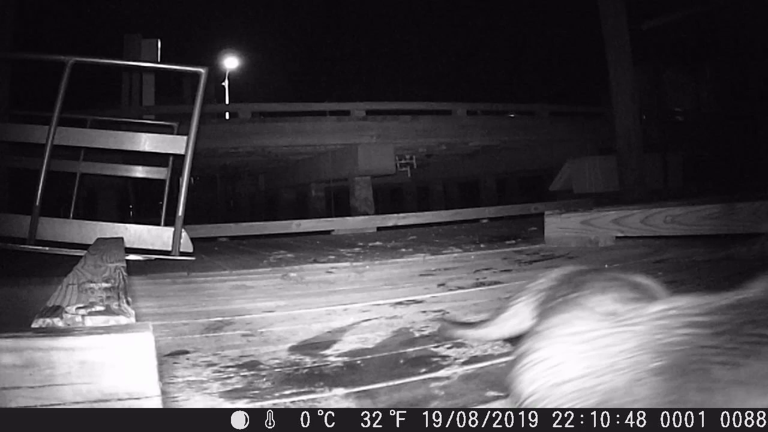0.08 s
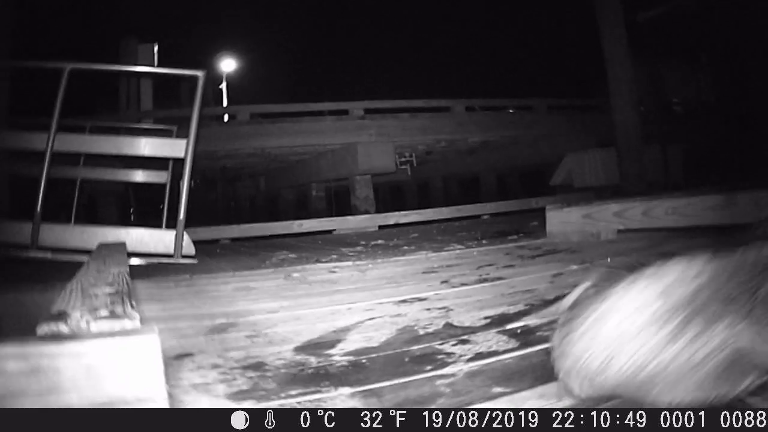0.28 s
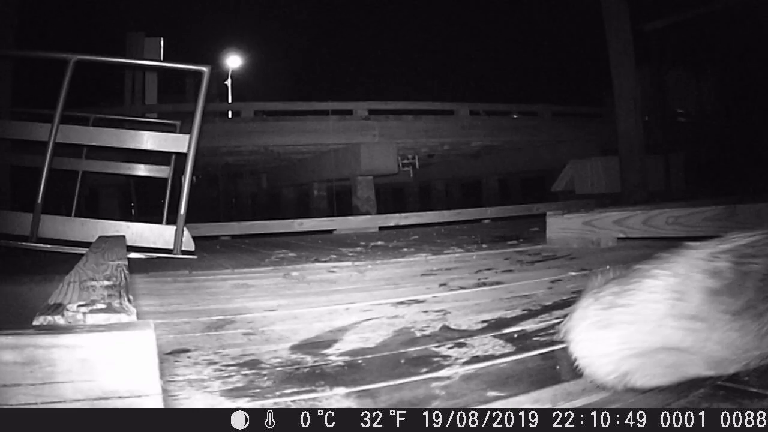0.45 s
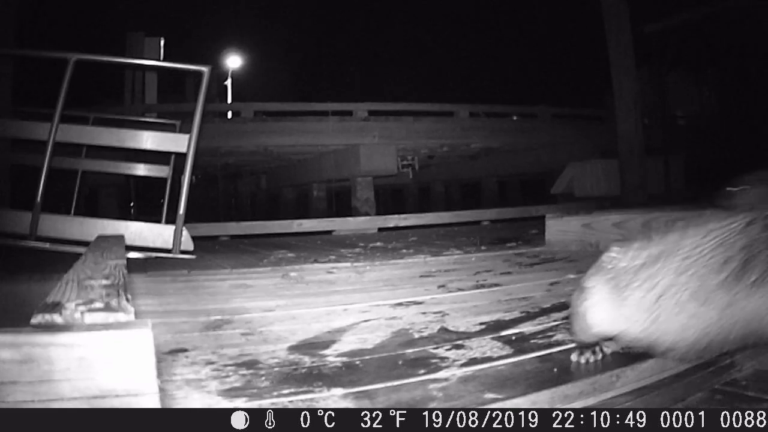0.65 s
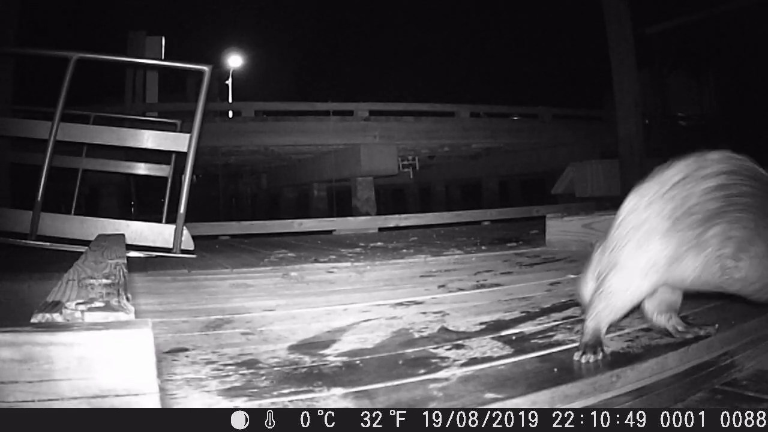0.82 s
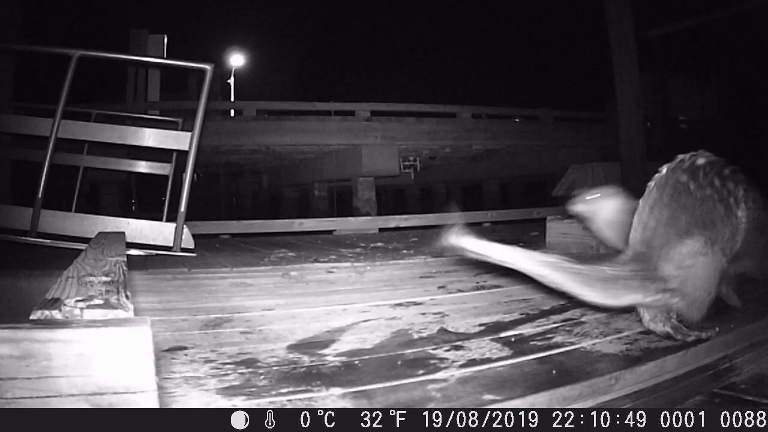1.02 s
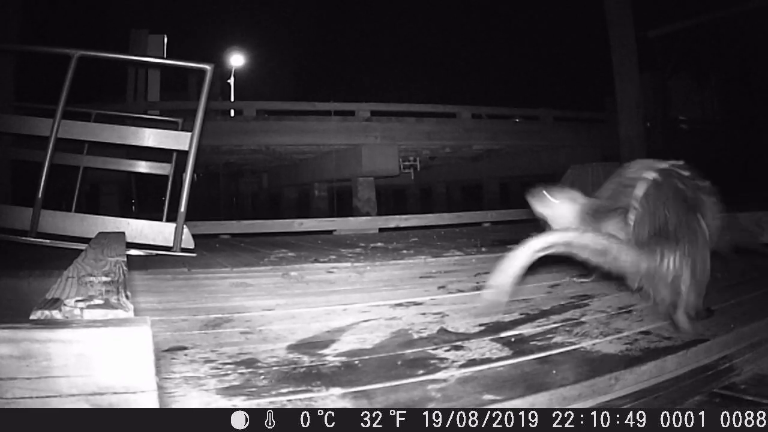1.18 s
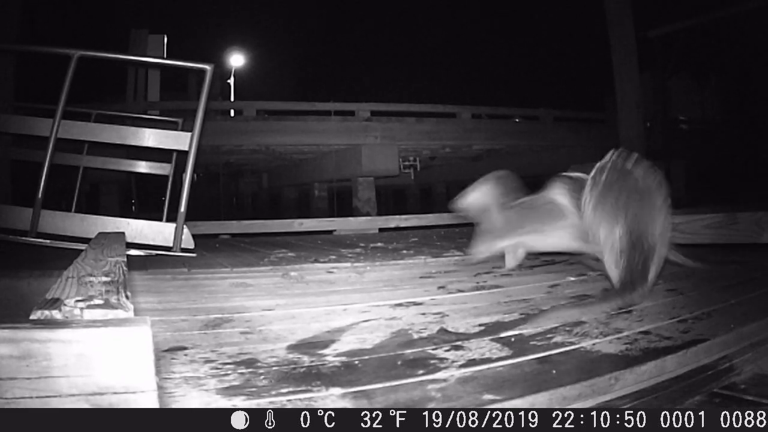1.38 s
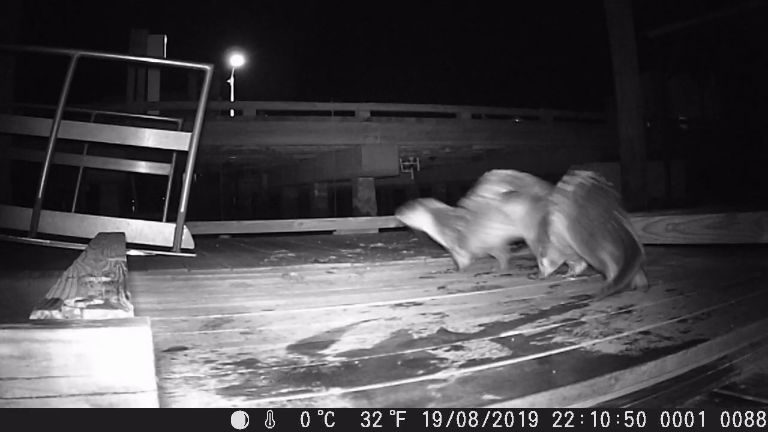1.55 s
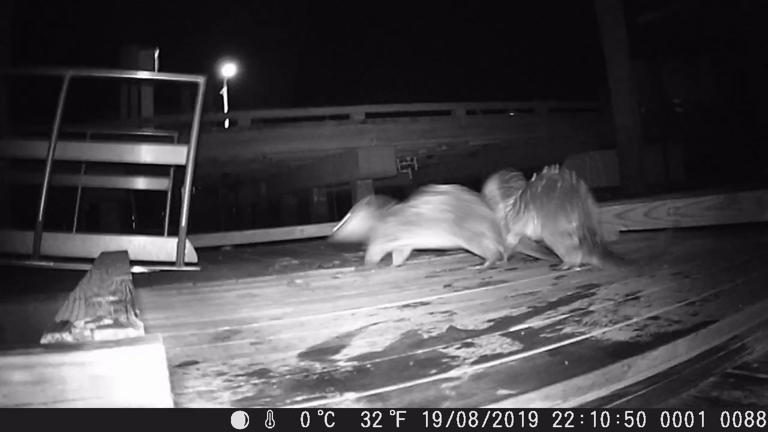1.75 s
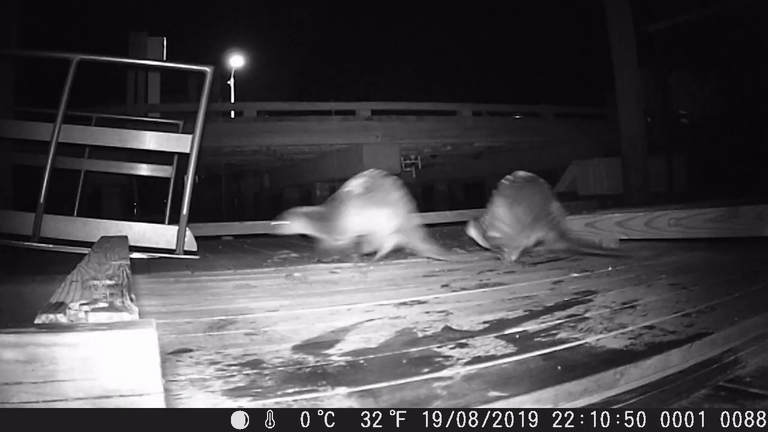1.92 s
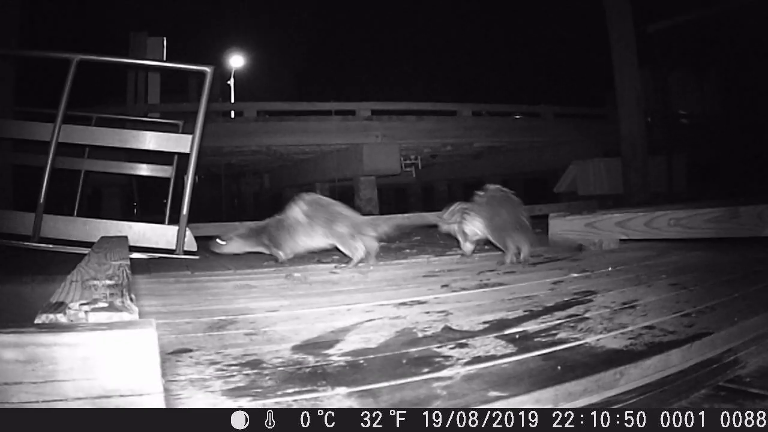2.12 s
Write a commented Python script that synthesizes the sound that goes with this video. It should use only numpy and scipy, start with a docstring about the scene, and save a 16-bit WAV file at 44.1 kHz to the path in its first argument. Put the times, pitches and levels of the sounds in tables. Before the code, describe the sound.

Scuffling on hollow wooden boards: brief claw scrapes and a heavy low bump, sparse faint scratches, then two sharp loud knocks amid busy scrabbling, and finally one ringing beam knock; close, dull handling-like sound, quiet night background.

```python
"""On a wooden dock at night, two animals scuffle close to a small camera standing on the boards.
Paws knock: each blow rings the planks and adds a gritty crack, and one blow rings a farther beam.
Claws and fur scrape: bursts of tiny random slips, coloured by the wood.
The deck sways in low gliding tones and once jolts the camera; there is also one thin squeak.
Behind this lie patchy background noise, a faint rumble and a very faint hiss, all filtered or plain noise."""
import sys
import numpy as np
from scipy import signal
from scipy.io import wavfile
from scipy.ndimage import uniform_filter1d

SR = 44100
rng = np.random.default_rng(int(sys.argv[2]) if len(sys.argv) > 2 else 0)


def generate_wav(sig):
    """Save sig (samples, or channels by samples) to the path in sys.argv[1] as 16-bit PCM at SR."""
    pcm = np.round(np.clip(np.atleast_2d(sig).T, -1, 1) * 32767).astype(np.int16)
    wavfile.write(sys.argv[1], SR, pcm)


def elevation(decibels):
    """Turn decibel levels (scalar or array-like) into linear amplitude ratios."""
    levels = np.asarray(decibels, float)
    return 10 ** (levels / 20)


N = 97020  # length in samples

# Colour of the background noise. Each row: frequency in Hz, relative level in dB per Hz.
BACKGROUND_COLOUR = [(15, -20), (60, -2), (107, -3), (150, -18), (300, -26), (460, -29), (890, -36),
                     (1330, -32), (1700, -41), (2500, -44), (3300, -53), (5000, -58), (6300, -59),
                     (7200, -56), (8500, -63), (9700, -78)]
BACKGROUND_DB, PATCH_DB = -51, 1.5  # overall level, and how unevenly it flickers
# Level of the low rumble in the deck. Each row: time in seconds, level in dB.
RUMBLE_LEVEL = [(0.0, -63), (0.14, -59.5), (0.25, -49), (0.69, -69), (1.07, -57.5), (1.43, -59.5),
                (1.53, -54.5), (1.68, -40.5), (1.83, -52.5), (2.07, -62.5), (2.2, -60.5)]
# Colour of the rumble. Each row: frequency in Hz, relative level in dB per Hz.
RUMBLE_COLOUR = [(15, -20), (40, 0), (110, -2), (200, -10), (320, -15), (500, -30), (1500, -45),
                 (3500, -90)]
HISS_DB = -99

# Sways of the deck. Each row: start in seconds, length in seconds, level in dB, first Hz, last Hz.
SWAYS = [(0.189, 0.062, -28.5, 23.5, 25.2), (0.279, 0.046, -31.5, 45.6, 44.6),
         (0.328, 0.09, -33.5, 27.3, 29.8), (0.648, 0.095, -27.5, 37.2, 59.6), (.905, 0.038, -30, 41, 40.3),
         (0.936, 0.097, -34, 39.7, 76.7), (1.43, 0.14, -42.5, 71.4, 95), (1.665, 0.028, -31, 116, 130),
         (1.71, 0.046, -32.5, 55, 60), (1.76, 0.16, -32, 45.7, 54)]
# A thin squeak, in one row: start in seconds, length in seconds, level in dB, first Hz, last Hz.
SQUEAK = (.105, .09, -63, 1325, 1350)
SWAY_SOFT = 0.92  # larger = gentler start and end
SWAY_PEAK = 0.33  # share of the length at which a sway or the squeak is strongest

# The jolt of the camera: a push held for a moment, then a longer, weaker rebound.
JOLT_S, JOLT_DB = 0.2305, -9
HOLD_MS, REBOUND_MS, EDGE_MS = 10, 21, 4.5
REBOUND_SHARE = 0.42  # strength of the rebound as a share of the push
SAG_HZ = 9  # the microphone lets slow pushes sag below about this frequency

# Claws and fur dragged over wood.
# Each row: start in seconds, length in seconds, first level in dB, last level in dB, extra treble in dB
# (before the shares in TREBLE_SHARE).
SCUFFS = [(0.181, .019, -60.5, -44.5, -4), (0.197, .031, -39.5, -45.5, -3), (.228, 0.03, -54.5, -59, -0.5),
          (0.233, 0.007, -57, -55, 9.5), (0.263, 0.081, -62.5, -51.5, -10.5), (0.325, 0.068, -46, -58, -5),
          (0.412, 0.032, -60, -70, -18), (0.463, 0.027, -62, -57, -11), (0.5, 0.024, -55, -65.5, -0.5),
          (0.616, 0.0354, -54, -59, 0.5), (0.648, 0.033, -59.5, -56.5, 2), (0.775, 0.14, -79, -69, -5),
          (.895, 0.037, -55.5, -52, -9.5), (0.997, 0.014, -63, -65.5, 0), (1.079, 0.063, -70, -77, -14),
          (1.244, 0.13, -66, -57.5, -6), (1.381, 0.074, -68, -70.5, 0), (1.456, 0.029, -53, -59, -21),
          (1.485, 0.0081, -52, -62, 8.5), (1.512, 0.047, -51.5, -59.5, -5),
          (1.556, 0.0503, -62, -52.5, -0.5), (1.606, 0.0082, -50.5, -45, 3.5),
          (1.614, 0.015, -41, -45, 0.5), (1.63, 0.0114, -47, -57.5, -2.5), (1.635, 0.024, -40.5, -51, -2.5),
          (1.665, .035, -46.5, -47.5, -7.5), (1.695, 0.048, -48, -45.5, -3),
          (1.729, 0.021, -58.5, -64.5, 12.5), (1.751, .062, -57, -46, -2), (1.804, 0.014, -39, -44, -0.5),
          (1.815, 0.037, -45.5, -48.5, -9), (1.856, 0.016, -47.5, -59, -3), (1.874, 0.038, -69.5, -68, -27),
          (2.079, 0.036, -51.5, -62, -20)]
SCUFF_EDGE_MS = 1.2
GRAINS_PER_S, GRAIN_SPREAD_DB, CLUMP_DB = 3000, 0.5, 0.5  # slips, their unevenness, their clumping
RING_DB = -5  # plank ringing in a scuff, next to its direct sound
# Colour of scrapes and cracks. Each row: frequency in Hz, relative level in dB per Hz.
GRIT_COLOUR = [(100, -12), (300, -5), (550, -2), (720, 2), (900, -6), (1350, 0), (1750, -10), (2000, -7),
               (2550, -6), (3100, -24), (3600, -25), (4400, -31), (5100, -42), (6400, -48), (6900, -30),
               (9000, -37), (9800, -70)]
# How much of the extra treble reaches each pitch. Each row: frequency in Hz, share of the extra treble.
TREBLE_SHARE = [(900, 0.22), (1300, 0.42), (2600, 1.32), (3600, 1.4), (6000, 1.75)]

# Paw blows on the planks.
# Each row: time in seconds, level in dB, contact time in milliseconds, level of the crack in dB.
KNOCKS = [(0.329, -23, 5.66, -42), (.339, -28, 5.87, -37.5), (.470, -44.5, 0.94, -55),
          (.628, -35.5, 7.1, -47), (.662, -44, 5, -72), (.899, -34, 5.1, -58.5), (1.268, -44.5, 6.9, -84),
          (1.456, -42.5, 1.4, -54), (1.487, -54, 2.1, -45), (1.516, -39.5, 3, -64),
          (1.570, -36.5, 1.15, -51), (1.6555, -12.5, 0.79, -30), (1.719, -31.5, 5.9, -58),
          (1.768, -28, 8.1, -45), (1.805, -30, 3.2, -39.5), (1.8108, -10.5, 4.31, -30),
          (1.843, -29, 2.5, -52.5)]
# Ringing tones of the planks. Each row: frequency in Hz, relative level in dB, time to fade 60 dB in seconds.
PLANK = [(140.7, 6, 0.065), (242, 3, 0.04), (328.2, 3, 0.049), (581, 5, 0.042), (688, 0.5, 0.087),
         (790, 4, 0.016), (982, -5, 0.021), (1320, -2, 0.017), (1520, -0.5, .025), (1970, -1, .02),
         (2320, -4, 0.021), (2580, 2.5, .02)]
CRACK_T60_S, CRACK_TREBLE_DB = 0.035, -3  # time to fade 60 dB, and extra treble before the shares
# A blow on a farther beam, in one row: time in seconds, level in dB, contact time in milliseconds.
BEAM_BLOW = (2.0855, -27, 2.1)
# Ringing tones of the beam. Each row: frequency in Hz, relative level in dB, time to fade 60 dB in seconds.
BEAM = [(141.2, -2, 0.37), (254, -12, 0.31), (360.3, -1.5, 0.2), (404.5, -6, 0.16), (493, -10, 0.14),
        (438, -1.5, 0.042), (544, -11, .04), (733, -19.5, 0.15), (1080, -9.5, 0.053), (1226, 7.5, .06),
        (1400, -3, .08)]


def evened(x):
    """Scales a sound to an average (rms) strength of 1."""
    return x / np.sqrt(np.mean(x ** 2) + 1e-20)


def read(points, hz):
    """Reads a table between its rows, on a log-frequency axis as the ear hears pitch."""
    table_hz, value = np.transpose(points)
    return np.interp(np.log(hz + 1), np.log(table_hz + 1), value)


def level(curve):
    """Turns a table of times and dB into a gain for every sample."""
    return elevation(np.interp(np.arange(N) / SR, *np.transpose(curve)))


def add(mix, start_s, sound):
    """Mixes a sound in at the given time."""
    part = mix[round(start_s * SR):][:len(sound)]
    part += sound[:len(part)]


def coloured(x, points):
    """Filters a sound to the given colour, with no sound ahead of its cause (minimum phase)."""
    colour_db = np.maximum(read(points, np.fft.rfftfreq(8192, 1 / SR)), -100)
    half = np.log(elevation(colour_db))
    both_halves = np.r_[half, half[-2:0:-1]]
    spectrum = np.exp(np.conj(signal.hilbert(both_halves)))
    response = np.fft.ifft(spectrum).real[:4096]
    return signal.oaconvolve(x, response)[:len(x)]


def brightened(treble_db):
    """The grit colour with its treble lifted, or dulled if treble_db is negative."""
    return [(hz, db + treble_db * read(TREBLE_SHARE, hz)) for hz, db in GRIT_COLOUR]


def ring(modes):
    """One sharp tap on wood: each of its tones dies away at its own rate."""
    t = np.arange(SR // 3) / SR
    return sum(elevation(db - 60 * t / t60) * np.sin(2 * np.pi * hz * t) for hz, db, t60 in modes)


def glide(length_s, db, first_hz, last_hz):
    """A tone that swells and fades while its pitch glides."""
    u = np.arange(0, 1, 1 / (length_s * SR))
    warped = u ** (np.log(0.5) / np.log(SWAY_PEAK))  # puts the peak at SWAY_PEAK
    shape = np.sin(np.pi * warped) ** SWAY_SOFT
    hz = first_hz + (last_hz - first_hz) * u
    return elevation(db) * shape * np.sin(2 * np.pi * np.cumsum(hz) / SR)


def background():
    """Noise whose strength varies in random patches over time and pitch."""
    frames, hz = N // 256 + 5, np.fft.rfftfreq(1024, 1 / SR)
    real, imaginary, patches = rng.standard_normal((frames, 513, 3)).T
    patches = uniform_filter1d(patches, 10, 0)  # smooth over pitch
    patches = evened(uniform_filter1d(patches, 10, 1))  # smooth over time
    gain = elevation(read(BACKGROUND_COLOUR, hz)[:, None] + PATCH_DB * patches)
    noise = signal.istft((real + 1j * imaginary) * gain, nperseg=1024, noverlap=768)[1][:N]
    return elevation(BACKGROUND_DB) * evened(noise)


def rumble():
    """Low noise carried by the deck, rising and falling in level."""
    return level(RUMBLE_LEVEL) * evened(coloured(rng.standard_normal(N), RUMBLE_COLOUR))


def hiss():
    """Electronic hiss: plain white noise."""
    return elevation(HISS_DB) * rng.standard_normal(N)


def sways():
    """The deck sways: each sway is a low tone that glides."""
    out = np.zeros(N)
    for start_s, *settings in SWAYS:
        add(out, start_s, glide(*settings))
    return out


def squeak():
    """One thin squeak: a faint, higher gliding tone."""
    out = np.zeros(N)
    add(out, SQUEAK[0], glide(*SQUEAK[1:]))
    return out


def jolt():
    """The camera is pushed and rebounds; the microphone lets both sag (a high-pass filter)."""
    out = np.zeros(N)
    step_ms = np.array([[0], [HOLD_MS], [HOLD_MS + REBOUND_MS]])
    ms = np.arange(SR // 4) * 1000 / SR - step_ms
    rise, fall, settle = np.sin(np.pi / 2 * np.clip(ms / EDGE_MS, 0, 1)) ** 2
    push = rise - (1 + REBOUND_SHARE) * fall + REBOUND_SHARE * settle
    sagging = signal.lfilter([1, -1], [1, -np.exp(-2 * np.pi * SAG_HZ / SR)], push)
    add(out, JOLT_S, elevation(JOLT_DB) * sagging)
    return out


def slips():
    """Claws catch and slip: dense tiny clicks of uneven size, in clumps."""
    spread = np.minimum(rng.exponential(1, N), 4)
    size = elevation(GRAIN_SPREAD_DB * spread) * rng.standard_normal(N)
    clumps = elevation(CLUMP_DB * evened(uniform_filter1d(rng.standard_normal(N), 250)))
    happens = rng.random(N) < GRAINS_PER_S / SR
    return evened(size * happens * clumps)


def scrapes():
    """Each scuff lets a stretch of slips through, heard directly and through the ringing planks."""
    grains = slips()
    out, click = np.zeros(N), np.r_[1, np.zeros(4095)]
    for start_s, length_s, first_db, last_db, treble_db in SCUFFS:
        t = np.arange(0, length_s, 1 / SR)
        edges = np.minimum(np.minimum(t, length_s - t) * 1000 / SCUFF_EDGE_MS, 1)
        shape = edges * elevation(first_db + (last_db - first_db) * t / length_s)
        colour = brightened(treble_db)
        direct = evened(coloured(click, colour))
        ringing = evened(coloured(ring(PLANK)[:len(click)], colour))
        wood = direct + elevation(RING_DB) * ringing
        wood = wood / np.linalg.norm(wood)
        piece = evened(grains[round(start_s * SR):][:len(t)])
        add(out, start_s, signal.fftconvolve(shape * piece, wood))
    return out


def blow(modes, db, contact_ms):
    """A soft push and rebound rings the wood; a longer contact gives a duller knock."""
    u = np.arange(0, 1, 1000 / (max(contact_ms, 0.3) * SR))
    force = np.sin(2 * np.pi * u) * np.sin(np.pi * u)
    sound = -signal.fftconvolve(ring(modes), force)
    return elevation(db) * sound / abs(sound).max()


def crack(db):
    """The gritty crack of a blow: coloured noise that starts fast and dies away."""
    t = np.arange(SR // 10) / SR
    grit = evened(coloured(rng.standard_normal(len(t)), brightened(CRACK_TREBLE_DB)))
    return elevation(db - 60 * t / CRACK_T60_S) * np.minimum(t / 0.001, 1) * grit


def knocks():
    """Paw blows ring and crack the planks; one more blow rings a farther beam."""
    out = np.zeros(N)
    for start_s, db, contact_ms, crack_db in KNOCKS:
        add(out, start_s, blow(PLANK, db, contact_ms))
        add(out, start_s, crack(crack_db))
    add(out, BEAM_BLOW[0], blow(BEAM, *BEAM_BLOW[1:]))
    return out


def scene():
    """All sources add up at the one microphone."""
    behind = background() + rumble() + hiss()
    deck = sways() + squeak() + jolt()
    return (behind + deck + scrapes() + knocks())[None]


def roll_off(x):
    """The treble ends steeply here."""
    return signal.sosfilt(signal.butter(12, 9750, fs=SR, output="sos"), x)


def record(dry):
    """The camera takes in the finished mix."""
    return roll_off(dry)


dry = scene()
out = record(dry)
generate_wav(out)
```